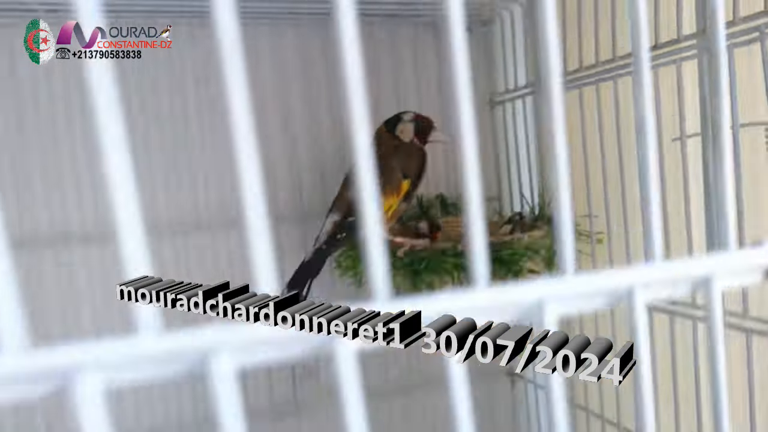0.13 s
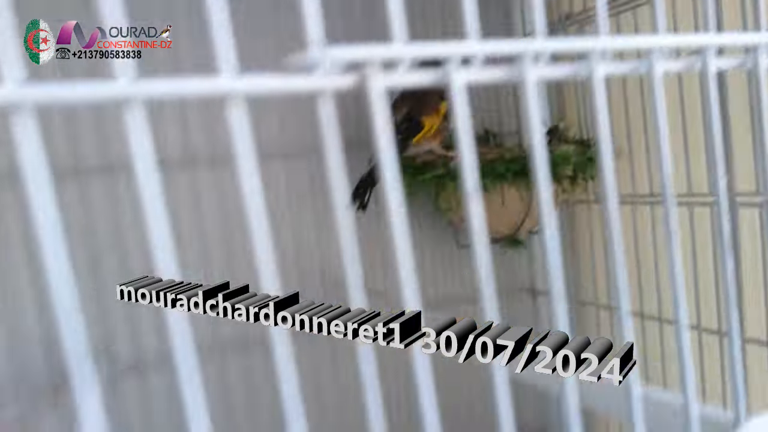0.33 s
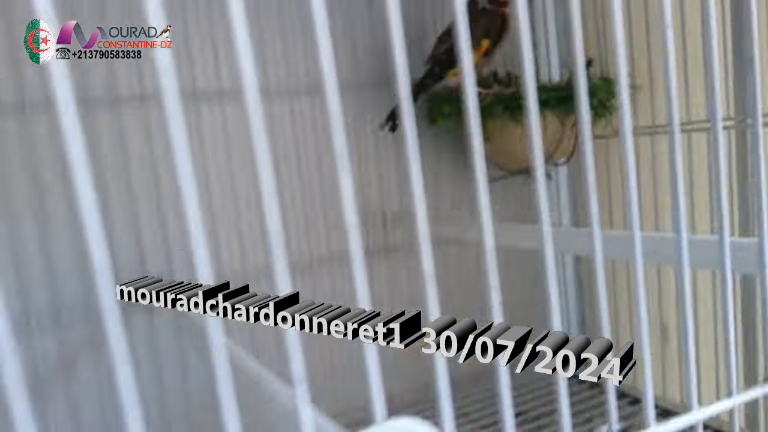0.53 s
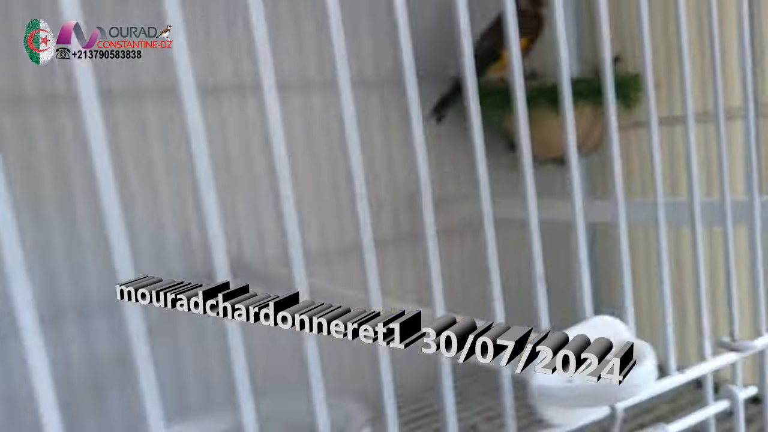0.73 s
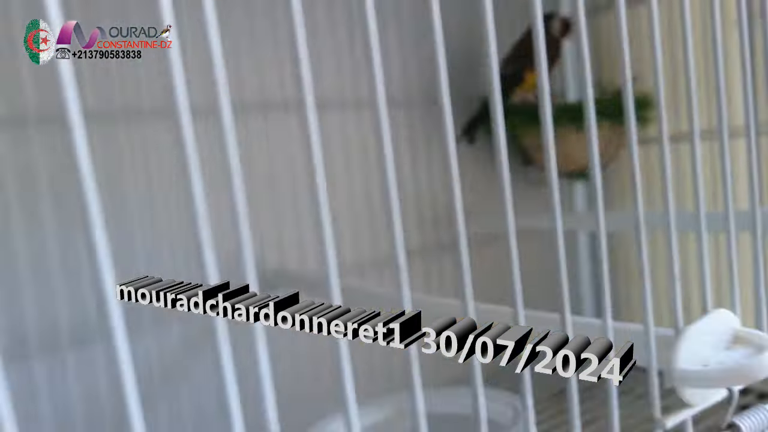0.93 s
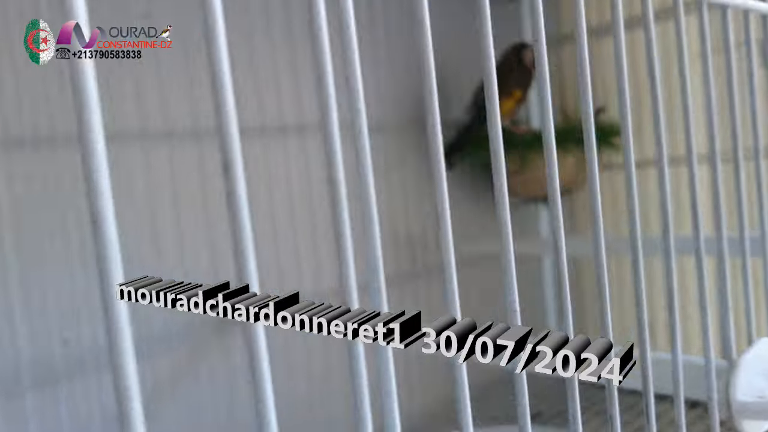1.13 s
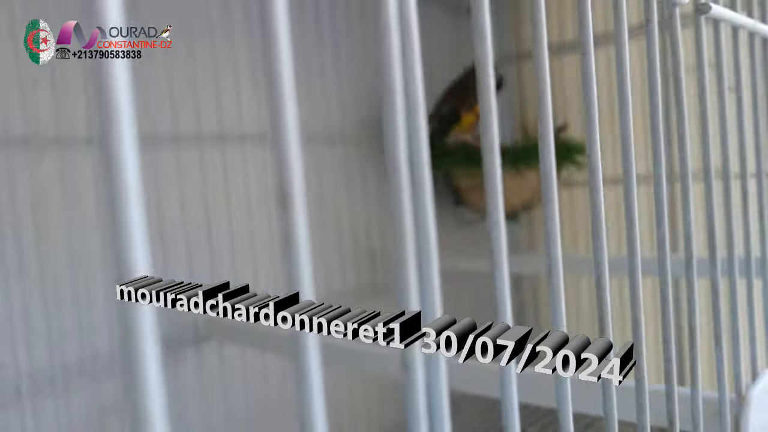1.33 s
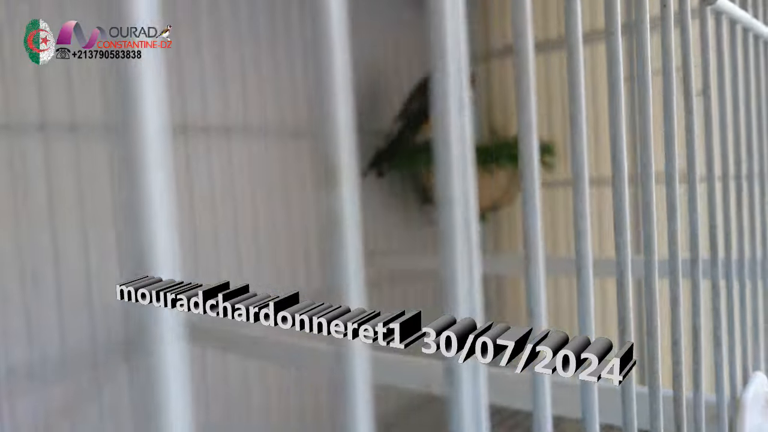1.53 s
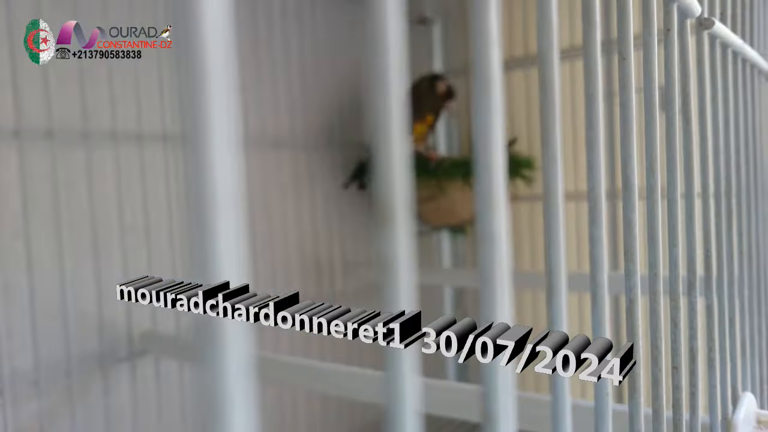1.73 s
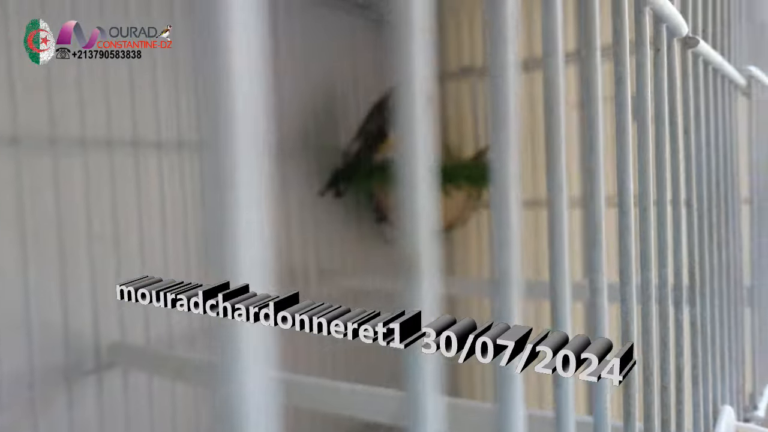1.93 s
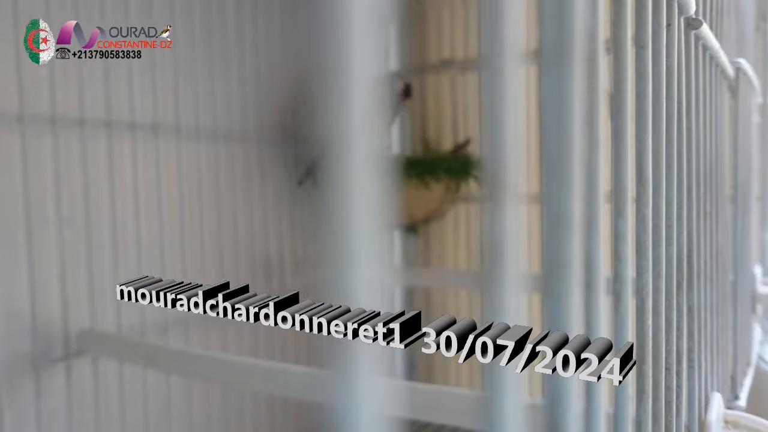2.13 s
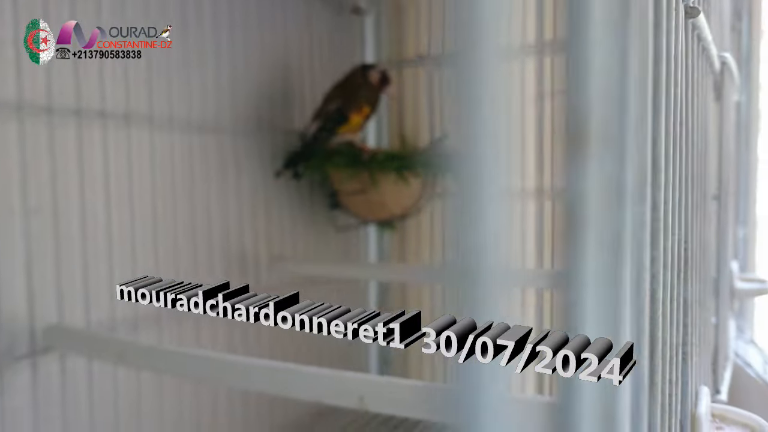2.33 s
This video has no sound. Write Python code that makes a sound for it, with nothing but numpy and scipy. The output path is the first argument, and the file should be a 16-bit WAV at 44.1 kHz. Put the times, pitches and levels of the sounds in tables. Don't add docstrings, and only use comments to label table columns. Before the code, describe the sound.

Rapid high goldfinch song, bright and slightly raspy, rings in a bare echoing room.

```python
import sys
import numpy as np
from scipy import signal
from scipy.fft import rfft, irfft
from scipy.io import wavfile
from scipy.ndimage import uniform_filter1d, minimum_filter1d

SR = 44100
rng = np.random.default_rng(int(sys.argv[2]) if len(sys.argv) > 2 else 0)


def voltage_ratio(level):
    return 10 ** (np.asarray(level, float) / 20)


def file_out(sig):
    cols = np.atleast_2d(sig).T
    lim = np.clip(cols, -1, 1)
    pcm = np.round(lim * 32767).astype(np.int16)
    wavfile.write(sys.argv[1], SR, pcm)


N = 110250
TIME_S = np.arange(N) / SR
BEND_FROM_S = 0.73
LEFT_RIGHT = np.array([[1], [-1]])


def walk(rate_hz):
    hold = int(SR / rate_hz)
    wander = np.repeat(rng.standard_normal(N // hold + 1), hold)
    wander = uniform_filter1d(uniform_filter1d(wander, hold), hold)[:N]
    return wander / wander.std()


def band_noise(lo_hz, hi_hz):
    sos = signal.butter(5, [lo_hz, hi_hz], "band", fs=SR, output="sos")
    noise = signal.sosfilt(sos, rng.standard_normal(N))
    return noise / noise.std()


def tail(t60_s, channels):
    t = np.arange(SR // 2) / SR
    h = rng.standard_normal((channels, len(t))) * np.exp(-np.log(1000) * t / t60_s)
    return h / np.sqrt(np.sum(h ** 2, axis=1, keepdims=True))


def through(source, response):
    return signal.fftconvolve(source[None], response, axes=1)[:, :N]


def whistles(notes, scoop_hz, rasps):
    flutter_db, waver_share, breath_db = 0.8, 0.006, -31
    octave_db, twelfth_db, octave_under_hz = -46, -40.5, 4800
    rasp_lo_hz, rasp_hi_hz = 180, 650
    rise_bend = 1.27
    swell_power, peak_at, scoop_s = 1.467, 0.47, 0.0016
    skew = np.log(0.5) / np.log(peak_at)

    flutter = voltage_ratio(flutter_db * walk(300))
    waver = 1 + waver_share * walk(400)
    rasp = np.zeros(N)
    for start_s, length_s, depth in rasps:
        rasp += depth * np.sin(np.pi * np.clip((TIME_S - start_s) / length_s, 0, 1))
    breath = voltage_ratio(breath_db) * band_noise(100, 1293)
    shake = breath + rasp * band_noise(rasp_lo_hz, rasp_hi_hz)
    wobble = breath + rasp * band_noise(rasp_lo_hz, rasp_hi_hz)
    grain = band_noise(rasp_lo_hz, rasp_hi_hz)
    fizz = band_noise(60, 1300)

    song = np.zeros(N)
    for start_s, length_s, hz0, hz1, level_db in notes:
        i = np.arange(max(int(start_s * SR), 0), min(int((start_s + length_s) * SR), N))
        t = np.maximum(i / SR - start_s, 0)
        glide = 1 - np.abs(1 - t / length_s) ** (rise_bend if hz1 > hz0 else 1)
        scoop = scoop_hz * np.tanh((hz1 - hz0) / 300) * np.exp(-t / scoop_s)
        pitch_hz = (hz0 + (hz1 - hz0) * glide - scoop) * waver[i]
        phase = 2 * np.pi * (np.cumsum(pitch_hz) / SR + rng.random()) + wobble[i]
        shape = np.abs(np.sin(np.pi * (t / length_s) ** skew)) ** swell_power

        mean_hz = (hz0 + hz1) / 2
        voice = np.sin(phase)
        if mean_hz < octave_under_hz:
            voice += fizz[i] * voltage_ratio(octave_db) * np.sin(2 * phase)
        if mean_hz < SR / 8 and start_s > BEND_FROM_S:
            voice += shape * (1 + grain[i] / 2) * voltage_ratio(twelfth_db) * np.sin(3 * phase)
        song[i] += voltage_ratio(level_db) * shape * flutter[i] * (1 + shake[i]) / (1 + rasp[i]) * voice
    return song


def near_bird():
    # t/s, length/s, first f/Hz, last f/Hz, peak level/dB
    song_notes = [(0.477, 0.019, 2915, 3330, -12.5), (0.494, 0.016, 3475, 3940, -16.5),
                  (0.53, 0.027, 4114, 4460, -4), (0.547, 0.02, 4500, 4676, -7),
                  (0.566, 0.013, 4590, 4700, -19), (0.59, 0.008, 4370, 4440, -33),
                  (0.644, 0.033, 2710, 2970, -18.5), (0.65, 0.015, 5640, 5750, -36.5),
                  (0.68, 0.03, 3005, 4180, -2), (0.707, 0.0063, 3925, 3930, -12),
                  (0.742, 0.035, 5330, 5770, -7), (0.745, 0.035, 4260, 5240, -7),
                  (0.773, 0.017, 5550, 5260, -13), (0.785, 0.005, 5130, 5150, -20.5),
                  (0.792, 0.005, 5440, 5220, -22.5), (0.808, 0.022, 2674, 3230, -16.5),
                  (0.865, 0.017, 3736, 3978, -2), (0.88, 0.0054, 3820, 3890, -10),
                  (0.927, 0.021, 2740, 2930, -24), (0.935, 0.023, 2920, 3200, -11.5),
                  (0.984, 0.017, 3777, 4047, -3), (0.999, 0.0045, 3790, 3790, -12.5),
                  (1.048, 0.02, 2710, 3238, -12.5), (1.099, 0.017, 3670, 4035, -3.5),
                  (1.114, 0.0073, 3780, 3890, -7.5),
                  (1.164, 0.019, 2865, 3274, -18), (1.178, 0.033, 2740, 3743, -11.5),
                (1.239, 0.017, 4540, 4960, -11.5), (1.238, 0.006, 2697, 3510, -16.5),
                (1.239, 0.027, 3530, 4410, -5), (1.296, 0.019, 2960, 3210, -18.5),
                (1.302, 0.0075, 2370, 2920, -22), (1.313, 0.028, 2900, 3695, -9),
                (1.367, 0.03, 2545, 2700, -18.5), (1.395, 0.035, 3670, 3800, -15.5),
                (1.399, 0.023, 2944, 3283, -10), (1.441, 0.022, 3730, 4530, -6),
                (1.44, 0.028, 4730, 5200, -8.5), (1.461, 0.012, 4370, 4750, -10.5),
                (1.482, 0.018, 5980, 5970, -9.5), (1.49, 0.022, 6034, 5484, -4.5),
                (1.508, 0.0097, 5530, 5400, -14.5), (1.554, 0.015, 2530, 3280, -22),
                (1.582, 0.015, 2927, 3160, -18), (1.589, 0.013, 3520, 4080, -13),
                (1.599, 0.019, 3570, 4120, -3.5),
                  (1.644, 0.042, 2750, 4800, -27), (1.652, 0.038, 2400, 3600, -23.5),
                (1.677, 0.042, 4537, 5370, -6.5), (1.68, 0.028, 3683, 4553, -7.5),
                (1.709, 0.013, 5060, 5480, -17.5), (1.748, 0.024, 2700, 3824, -23.5),
                (1.764, 0.013, 3810, 4640, -15), (1.772, 0.013, 4610, 4630, -25.5),
                (1.789, 0.023, 5730, 5180, -2), (1.805, 0.014, 5180, 5060, -7.5),
                (1.815, 0.005, 2990, 3600, -22), (1.819, 0.019, 3882, 4050, -3.5),
                (1.867, 0.023, 2420, 3240, -16.5), (1.892, 0.048, 4987, 4687, -1),
                (1.924, 0.026, 3220, 3530, -23.5), (1.941, 0.016, 3640, 3780, -4.5),
                (1.984, 0.017, 3220, 4440, -11), (1.996, 0.0099, 4530, 5020, -14),
                (2.008, 0.007, 3710, 4200, -5.5), (2.012, 0.019, 4200, 4444, -4),
                (2.019, 0.011, 4470, 5040, -8), (2.028, 0.009, 4320, 4870, -10.5),
                (2.039, 0.0073, 3970, 4670, -27.5),
                  (2.07, 0.025, 3350, 2550, -34), (2.093, 0.034, 2530, 3783, -19.5),
               (2.102, 0.042, 3740, 4700, -13.5), (2.119, 0.023, 3386, 4620, -13),
               (2.123, 0.022, 4290, 5720, -18.5), (2.143, 0.026, 5996, 5500, -4),
               (2.164, 0.008, 5620, 5550, -5), (2.172, 0.0061, 5350, 5510, -12),
               (2.177, 0.035, 5200, 4620, -1.5), (2.211, 0.017, 3634, 4120, -4),
               (2.265, 0.019, 2617, 2620, -25), (2.28, 0.014, 2650, 2760, -29),
               (2.289, 0.019, 2840, 3474, -19), (2.311, 0.043, 4750, 4570, -6),
               (2.377, 0.0078, 3796, 4000, -14.5), (2.383, 0.014, 3655, 4050, -3),
               (2.439, 0.021, 2250, 2085, -25.5), (2.447, 0.018, 2640, 2730, -28),
               (2.49, 0.0086, 3590, 4000, -19.5), (2.488, 0.0078, 2770, 3290, -22),
               (1.743, 0.016, 1977, 2580, -31.5), (2.493, 0.013, 2670, 4010, -12.5)]
    # t/s, length/s, depth/0-1
    raspy = [(0.492, 0.025, 0.5), (.68, 0.041, 0.43), (1.684, 0.067, 0.5), (1.5, 0.036, 0.9),
             (2.5, 0.036, 0.3), (.75, 0.052, 0.12), (0.9, .025, 0.3), (1.9, .04, 0.4), (1.44, 0.034, 0.19),
             (2, 0.032, 0.32), (1.3, 0.024, 0.14)]
    cage_t60_s, cage_db = 0.026, -13
    wall_delay_s, wall_t60_s, wall_db = 0.039, 0.025, -37
    room_t60_s, room_db, room_width = 1.0, -29.5, 0.16

    song = whistles(song_notes, 258, raspy)
    dull = signal.sosfilt(signal.butter(4, 7500, fs=SR, output="sos"), song)
    cage = voltage_ratio(cage_db) * through(dull, tail(cage_t60_s, channels=1))[0]
    late = np.r_[np.zeros(int(wall_delay_s * SR)), dull][:N]
    echo = voltage_ratio(wall_db) * through(late, tail(wall_t60_s, channels=1))
    mid, side = through(dull, tail(room_t60_s, channels=2))
    room = voltage_ratio(room_db + 3.5 * walk(44.81)) * (mid + room_width * side * LEFT_RIGHT)
    return song + cage + echo + room


def far_birds():
    # first t/s, period/s, count
    repeats = [(0, .22, 2), (.06, .225, 2), (.065, .22, 2), (.36, .2, 4), (.48, .3, 3), (.505, .2, 3),
               (1.15, 0, 1), (1.61, .111, 7), (1.62, .111, 7), (2.405, 0, 1), (2.405, 0, 1), (.47, .19, 11)]
    # length/s, first f/Hz, last f/Hz
    call_shapes = [(.05, 3720, 3700), (.06, 6680, 6650), (.05, 5780, 5730), (.045, 4900, 4280),
                   (.04, 4200, 6000), (.05, 6120, 6050), (.17, 8300, 4500), (.05, 6550, 6480),
                   (.05, 5800, 4300), (.06, 6280, 6220), (.08, 5080, 5050), (.07, 8400, 6600)]
    call_db = [-44.5, -44.5, -40, -37, -34, -32.5, -33.5, -39, -37, -38, -35, -50.5]
    notes = []
    for (first_s, period_s, count), call, level_db in zip(repeats, call_shapes, call_db):
        notes += [(first_s + k * period_s, *call, level_db) for k in range(count)]
    return through(whistles(notes, 0, [(0.92, 0.43, 0.82)]), tail(0.38, channels=2))


def rattle(centre_hz, width_hz, t60_s):
    edges_hz = [centre_hz - width_hz / 2, centre_hz + width_hz / 2]
    h = signal.lfilter(*signal.butter(2, edges_hz, "band", fs=SR), tail(t60_s, channels=1)[0])
    return h / np.abs(h).max()


def ticks():
    # t/s, peak level/dB, wire level/dB, thud level/dB
    claw_hits = [
        (0.1551, -26.5, -4.5, -7),
        (2.468, -24.5, -10.5, 4),
    ]
    wire = 4530, 2200, 0.028
    tray = 650, 1000, 0.076
    hits = np.zeros(N + SR)
    for t_s, peak_db, wire_db, thud_db in claw_hits:
        hit = voltage_ratio(wire_db) * rattle(*wire) + voltage_ratio(thud_db) * rattle(*tray)
        hits[int(t_s * SR):][:SR // 2] += voltage_ratio(peak_db) * hit
    return 0.83 * hits[:N] + 0.8 * through(hits[:N], tail(0.35, channels=2))


def air():
    # f/Hz, level/dB per Hz
    spectrum = np.array([(28, -16), (45, 4.5), (180, -6), (350, -4), (900, -9), (2200, -15.5),
                         (6000, -24.5), (8000, -35), (9500, -68.5)])
    air_db, fade_db_per_s, alike_hz = -46.5, -3, 300
    hum_hz, hum_db = 63.46, -64.5

    f_hz = np.fft.rfftfreq(N, 1 / SR) + 1
    colour = voltage_ratio(np.interp(np.log(f_hz), np.log(spectrum[:, 0]), spectrum[:, 1]))
    side_share = np.sqrt(f_hz / (f_hz + alike_hz)) * 0.73
    mid, side = rfft(rng.standard_normal((2, N))) * colour
    pair = mid + side_share * side * LEFT_RIGHT
    tone = np.zeros((2, N))
    for k in range(20):
        band = np.clip(1 - np.abs(2 * np.log2(f_hz / 20) - k), 0, 1)
        tone += irfft(pair * band, N) * voltage_ratio(2.78 * walk(4.43))
    hum = voltage_ratio(hum_db + 5.54 * walk(3)) * np.sin(2 * np.pi * hum_hz * TIME_S)
    return tone / tone.std() * voltage_ratio(air_db + fade_db_per_s * TIME_S) + hum


def scene():
    lean = voltage_ratio(-3 / 2 * LEFT_RIGHT)
    return near_bird() + (far_birds() + ticks() + air()) * lean


def band_limit(x):
    return signal.sosfilt(signal.butter(12, 15800, fs=SR, output="sos"), x)


def record(dry):
    gain = np.minimum(1 / np.abs(dry).max(axis=0).clip(1e-9), 1)
    limited = dry * uniform_filter1d(minimum_filter1d(gain, size=129), size=65)
    bend = 0.18 * (TIME_S > BEND_FROM_S)
    mix = limited * (1 + bend) - bend * limited ** 3
    return band_limit(mix)


dry = scene()
out = record(dry)
file_out(out)
```